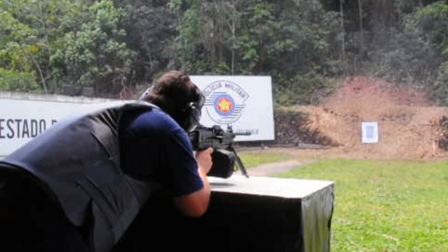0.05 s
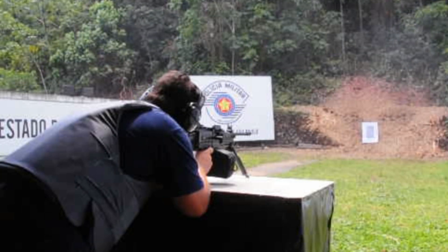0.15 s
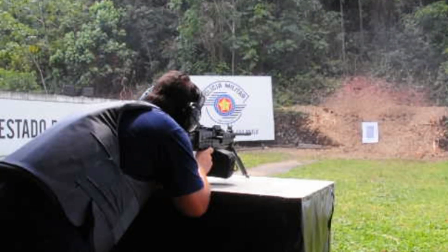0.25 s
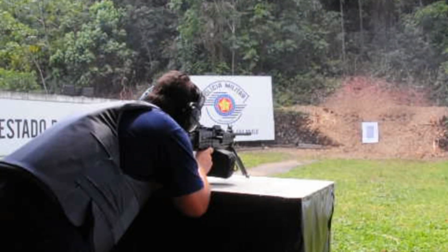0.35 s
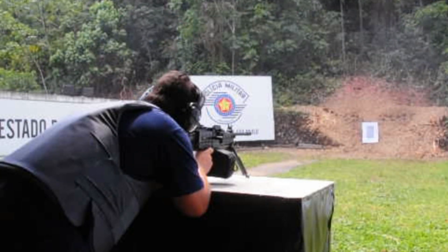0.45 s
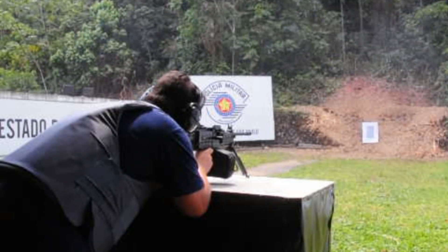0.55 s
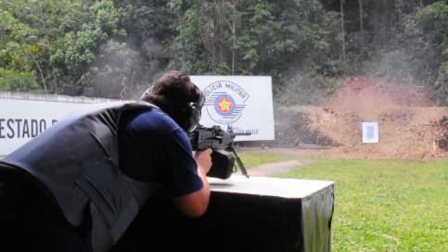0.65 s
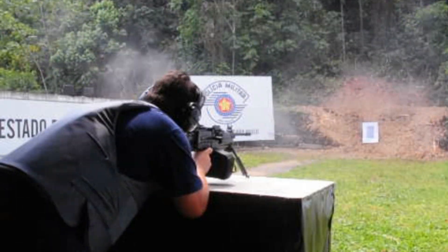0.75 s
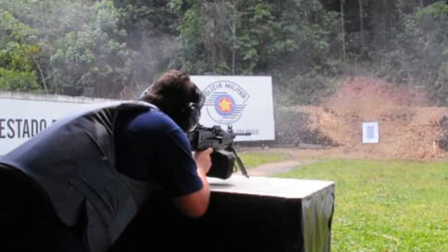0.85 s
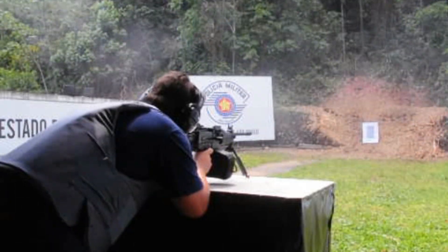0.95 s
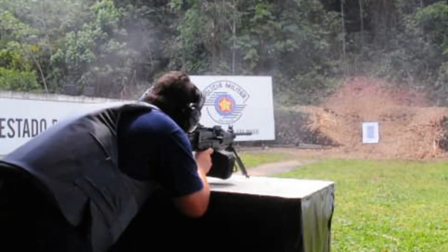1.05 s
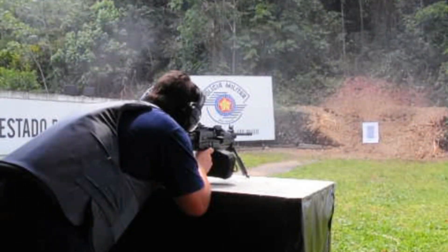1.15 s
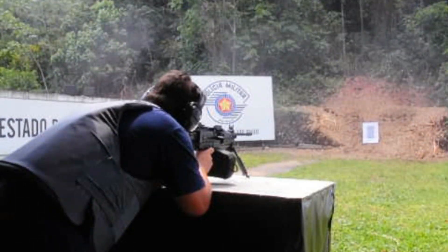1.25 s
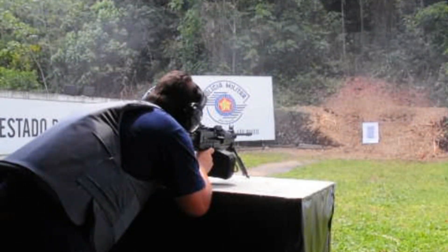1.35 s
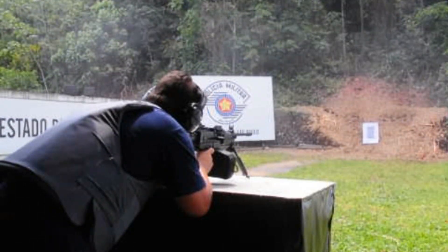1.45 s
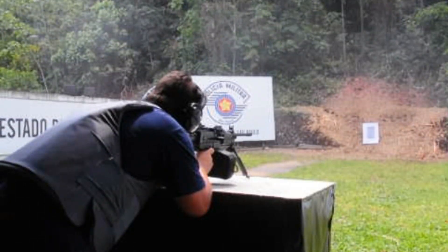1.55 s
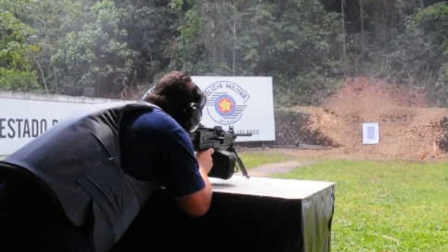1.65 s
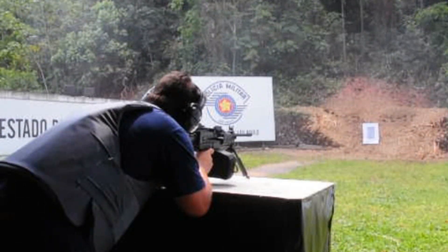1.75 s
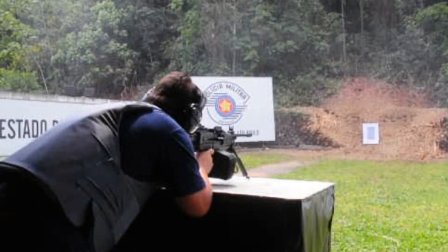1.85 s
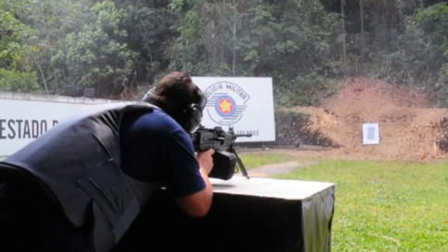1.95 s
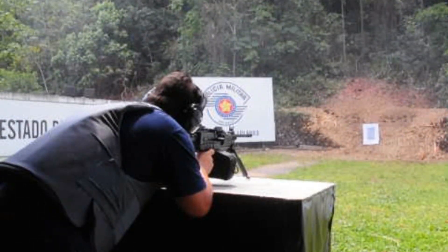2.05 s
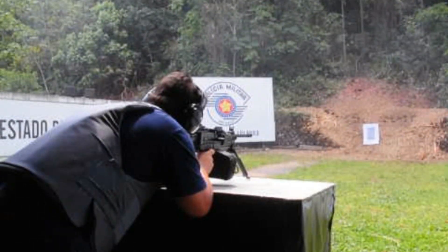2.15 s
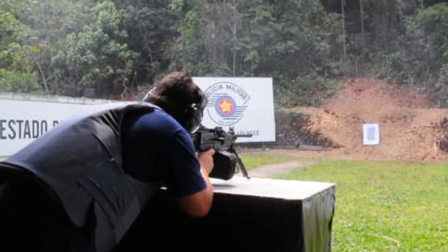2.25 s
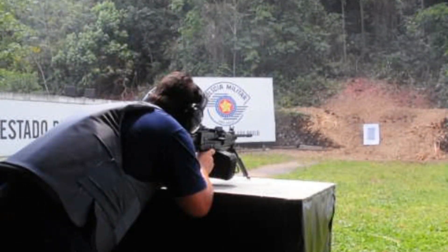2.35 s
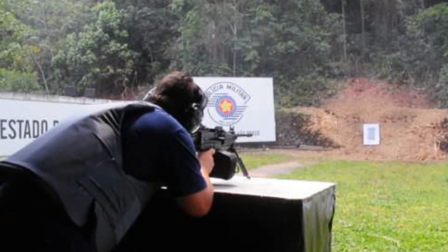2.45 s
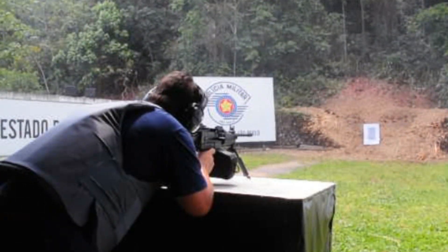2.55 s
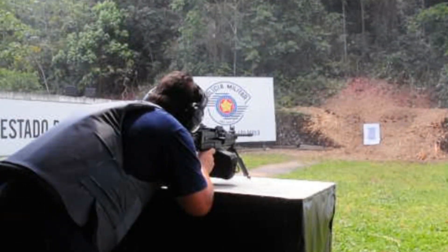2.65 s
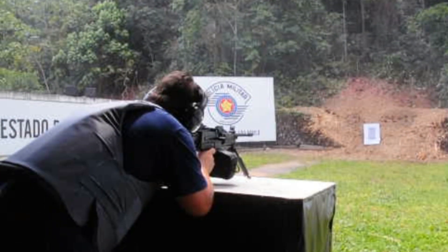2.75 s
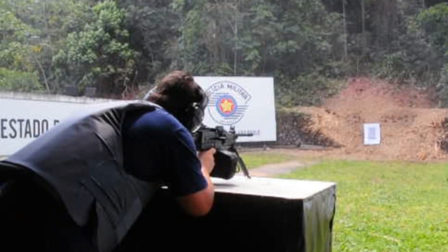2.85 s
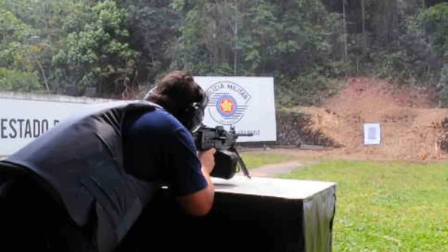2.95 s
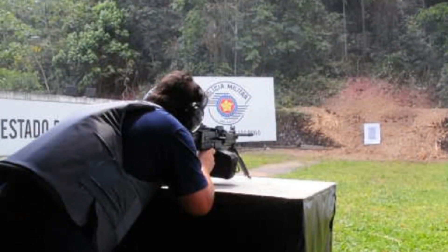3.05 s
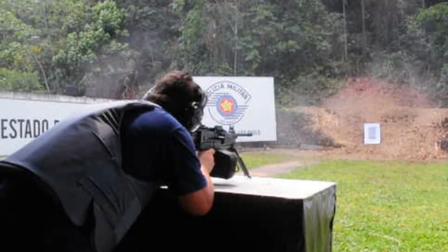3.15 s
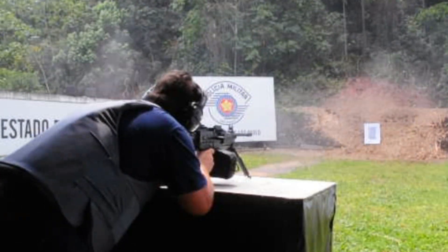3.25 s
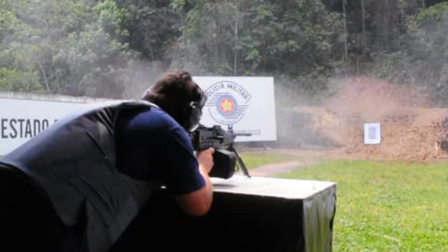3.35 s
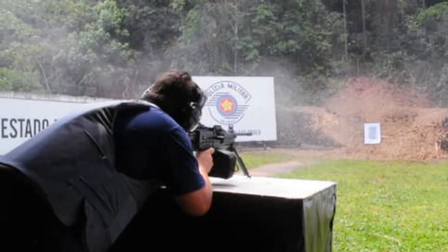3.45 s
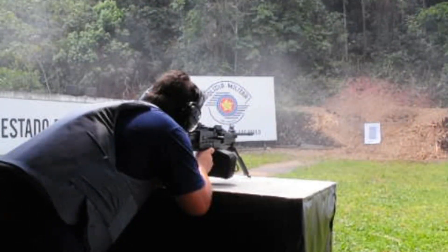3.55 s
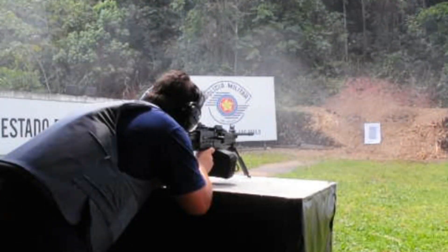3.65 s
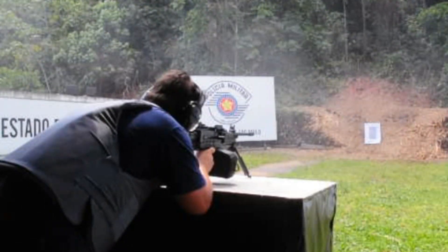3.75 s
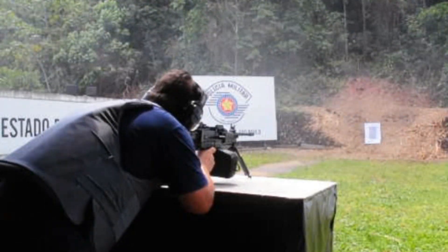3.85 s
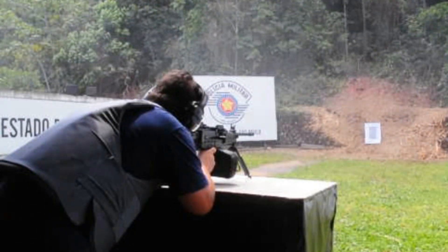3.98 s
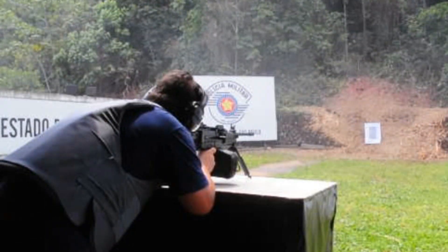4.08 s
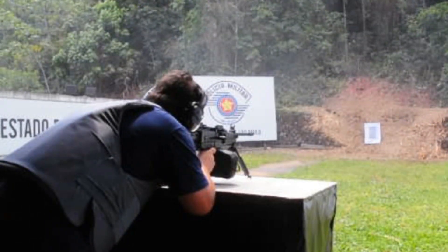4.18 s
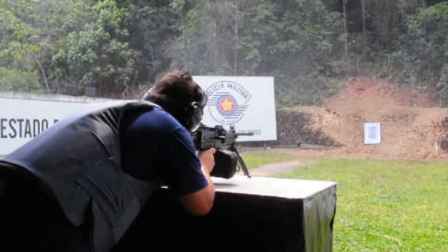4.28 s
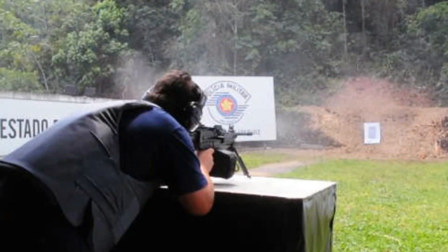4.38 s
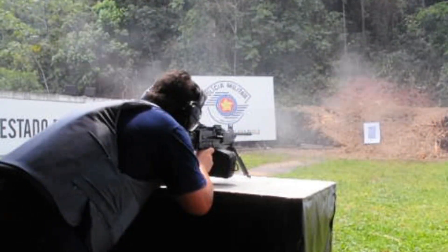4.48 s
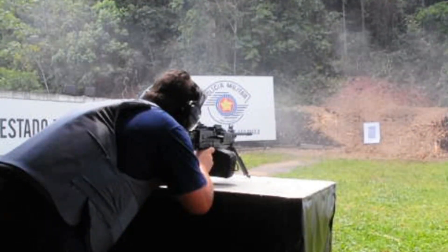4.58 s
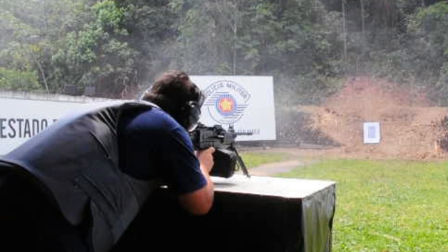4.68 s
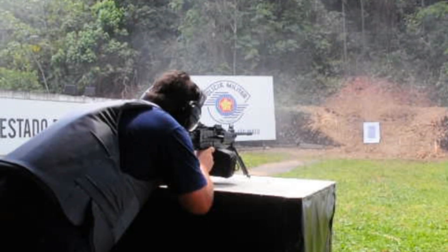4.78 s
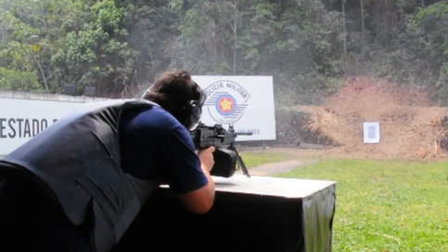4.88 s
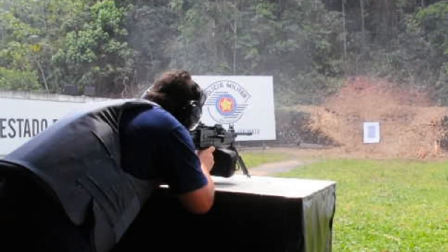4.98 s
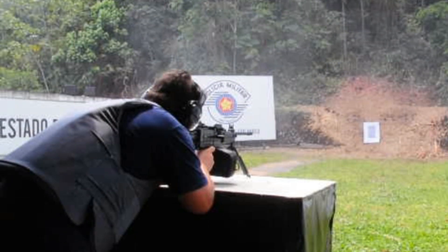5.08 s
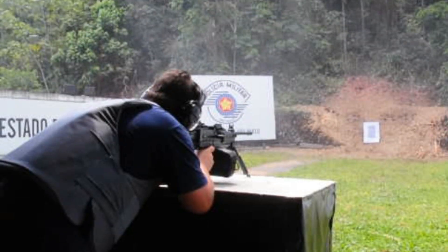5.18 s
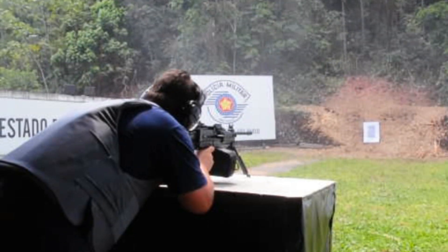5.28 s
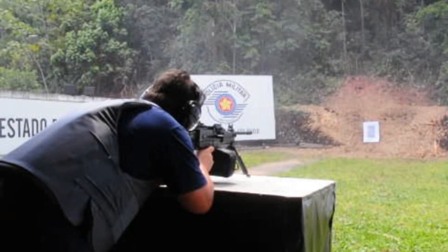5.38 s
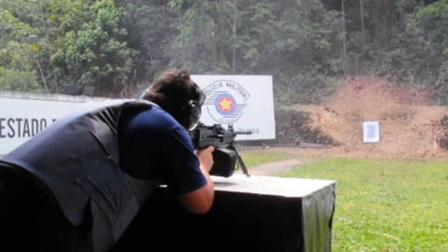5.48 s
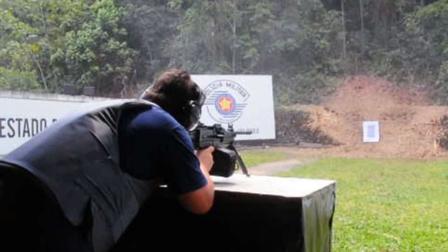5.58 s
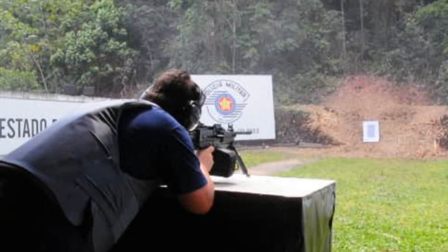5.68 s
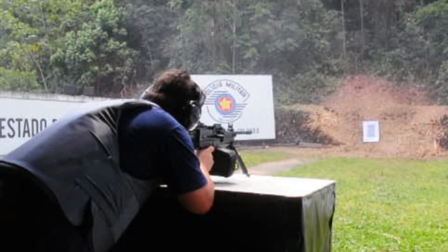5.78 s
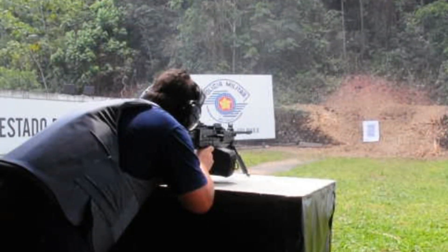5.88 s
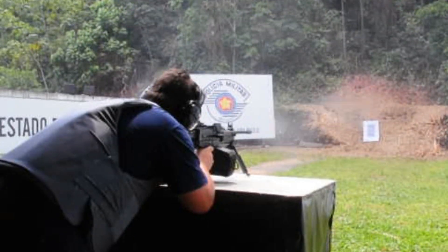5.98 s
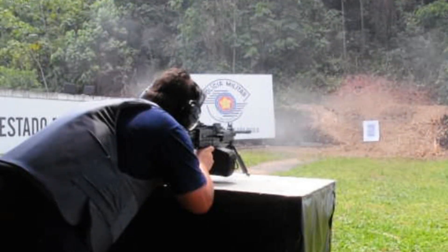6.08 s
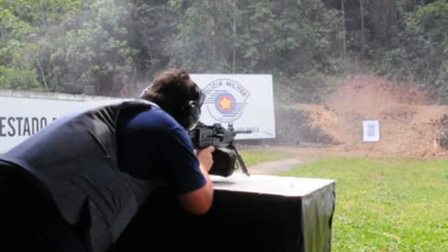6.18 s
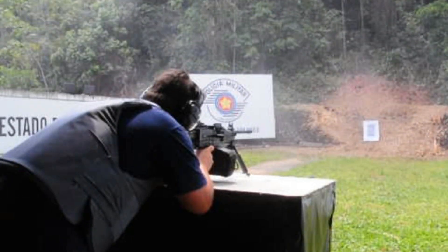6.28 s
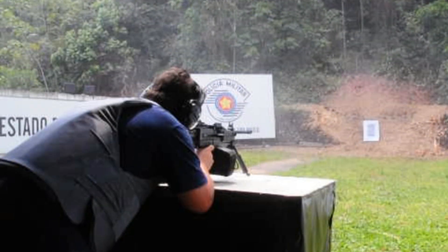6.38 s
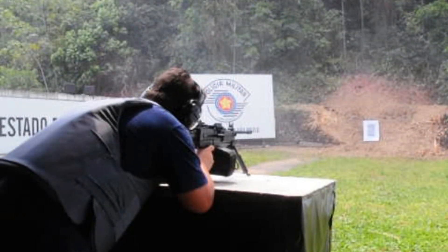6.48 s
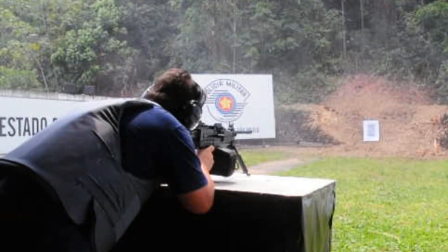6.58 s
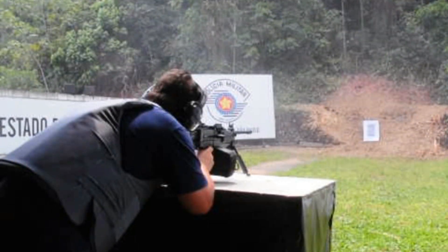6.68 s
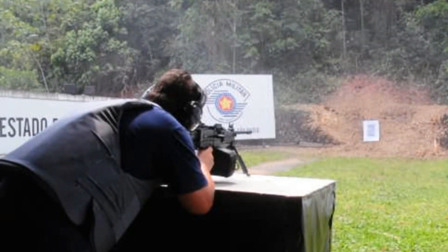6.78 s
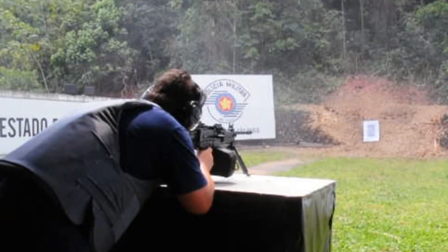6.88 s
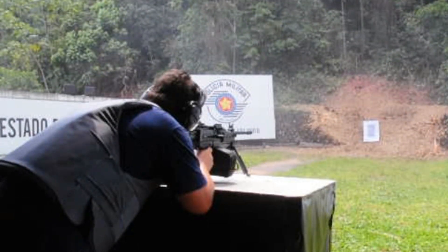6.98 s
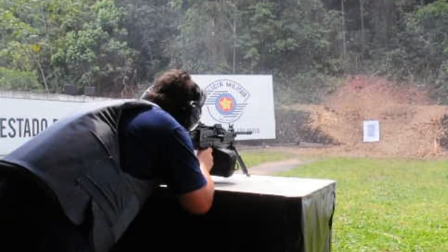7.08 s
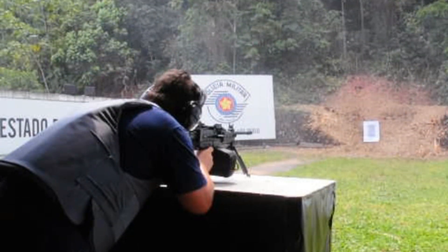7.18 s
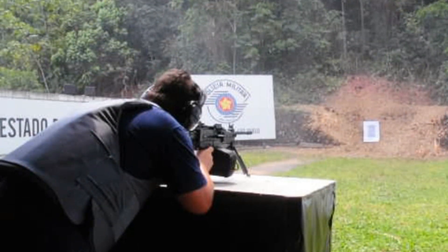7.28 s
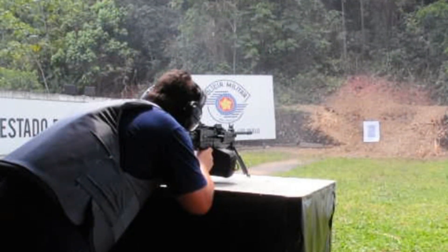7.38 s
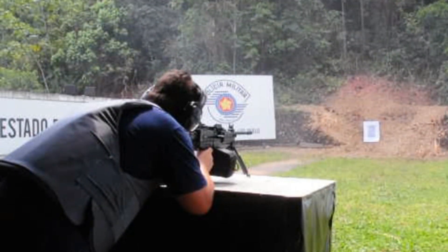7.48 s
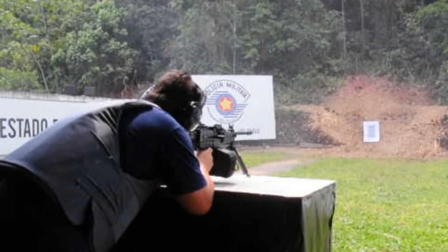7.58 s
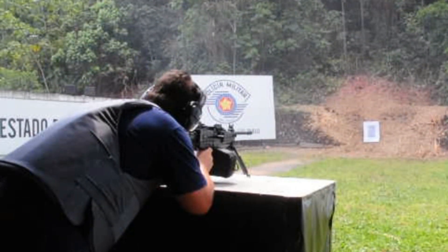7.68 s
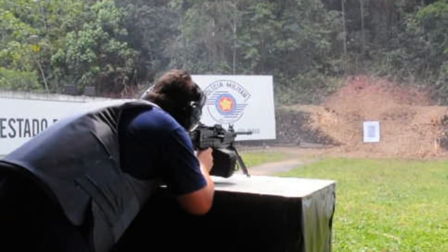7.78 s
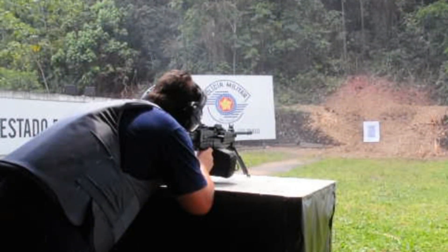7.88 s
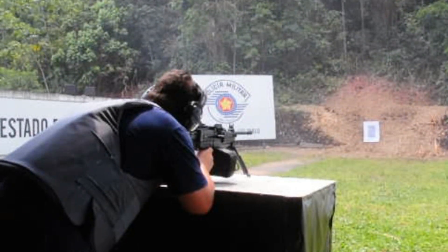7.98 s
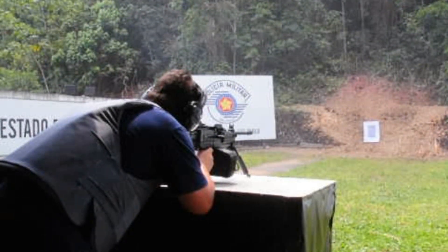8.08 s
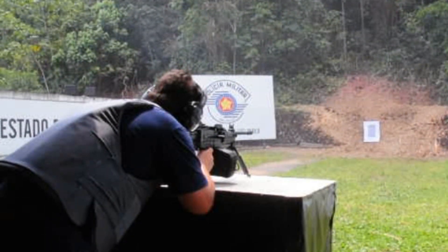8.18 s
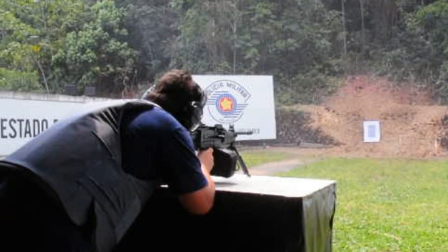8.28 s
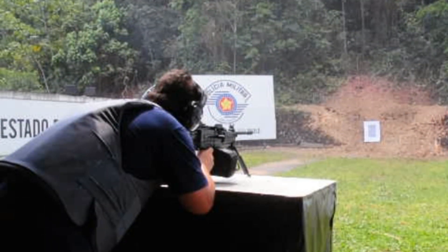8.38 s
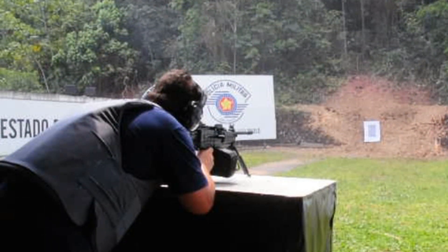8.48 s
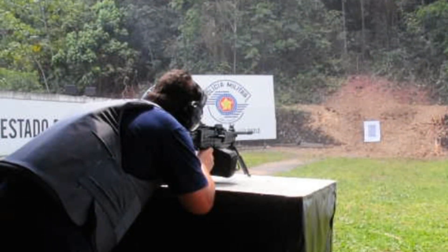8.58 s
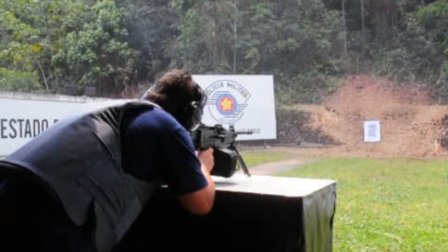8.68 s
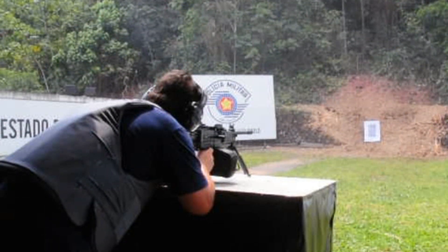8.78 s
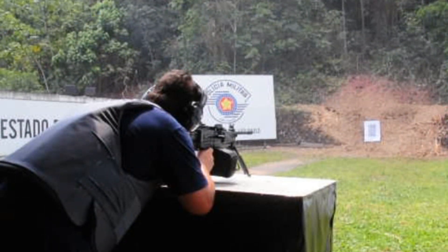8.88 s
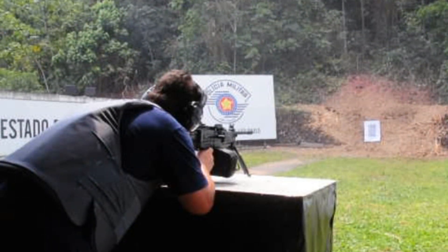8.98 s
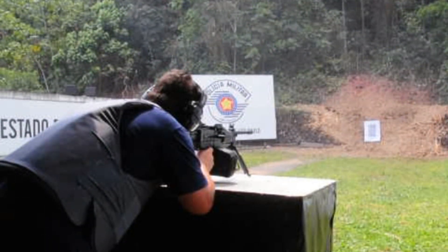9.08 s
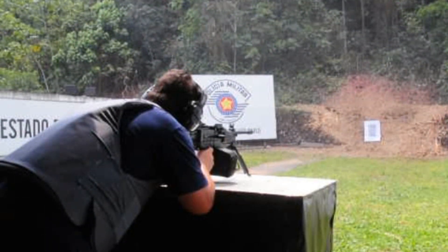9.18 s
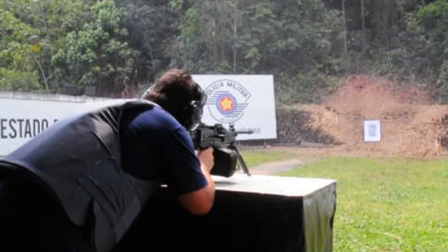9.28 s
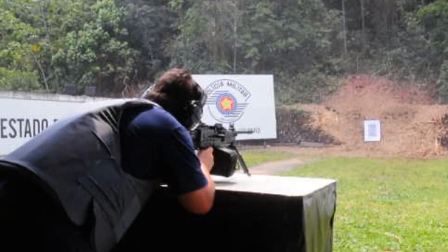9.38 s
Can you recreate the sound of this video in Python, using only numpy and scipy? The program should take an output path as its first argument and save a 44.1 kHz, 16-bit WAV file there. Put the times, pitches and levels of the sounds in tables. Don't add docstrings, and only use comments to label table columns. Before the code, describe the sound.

Heavy automatic gunfire in four brief bursts overloads a small microphone, echoing off walls, earth bank and forest, then fading into rustling leaves.

```python
import sys
import numpy as np
from scipy import signal
from scipy.fft import rfft, irfft, next_fast_len
from scipy.io import wavfile
from scipy.ndimage import uniform_filter1d

SR = 44100
rng = np.random.default_rng(int(sys.argv[2]) if len(sys.argv) > 2 else 0)


def to_wav(s):
    ch = np.atleast_2d(s).T
    pcm = np.round(np.clip(ch, -1, 1) * 32767)
    wavfile.write(sys.argv[1], SR, pcm.astype(np.int16))


def gain_from_db(level_db):
    decades = np.asarray(level_db, float) / 20
    return 10 ** decades


N = 416304

# t/s, level/dB, 20 dB fade/s
RUSTLES = [(0, -51.5, 1.5), (.1, -59, 3), (.25, -56, 0), (2.7, -50, 0.2), (3.02, -50, 2), (7.82, -49, 1.3),
           (8.085, -45, .08), (8.185, -44.5, 0.3), (8.4, -47.5, 0.6), (8.5, -42.5, 0.2),
           (8.56, -41.5, 0.18), (8.93, -47, .5), (9.13, -52, .7)]
# f/Hz, density/dB
LEAF_SPECTRUM = [(600, -21.5), (1500, 6), (2500, 7), (3600, 2), (4600, -4), (5400, -20)]
RUSTLE_LEAD, RUSTLE_BED_DB = .15, -74
# t/s, level/dB, 20 dB fade/s
GUSTS = [
    (0, -42.5, 0.7),
    (2.3, -58, .4),
    (4.35, -29, 0.9),
    (7.7, -52, 0),
    (8.43, -48, 0.8),
    (8.97, -50.5, .25),
]
# f/Hz, density/dB
WIND_SPECTRUM = [(15, -19.0), (40, -7.5), (70, -2.5), (115, -3.5), (200, -33.5), (400, -82)]
GUST_LEAD, BREEZE_DB, LUMPY_DB = 0.84, -61.5, 4
# f/Hz, density/dB
FLOOR_SPECTRUM = [(13, -46), (22, 4), (81, -8), (111, -15.5), (144, 3.5), (169, 1.5), (418, 1.5),
                  (897, -8.5), (1210, -3.5), (1640, -16), (3520, -24.5), (4550, -35.5), (5600, -66.5),
                  (7280, -76), (12300, -120)]
FLOOR_DB = -39
# f/Hz, width/Hz, level/dB
MACHINERY = [(1226, 150, -48.5), (1420, 150, -51.5), (2058, 50, -59.5), (1067, 88, -52)]

# t/s, level/dB, rise/s, t60/s
TRIGGER = (.529, -34, .0025, .08)
# sear release t/s, round strip t/s, first shot t/s, bolt force/dB
BURSTS = [
    (0.57, 0.594, .632, 2.5),
    (3.066, 3.085, 3.126, 1.5),
    (4.359, 4.381, 4.417, -3.5),
    (5.964, 5.986, 6.021, 0),
]
# offset/s, level/dB, rise/s, t60/s
STROKE = [
    (0, -20.5, 0.0016, 0.18),
    (0.0058, -17, .001, .045),
    (0, -5.5, 0.003, .045),
    (.014, -16.5, .004, 0.18),
    (-.009, -9.5, 0.0028, 0.088),
]
# f/Hz, density/dB
STEEL_SPECTRUM = [(88, -46.5), (150, -33.5), (283, -9.5), (395, -24.5), (1070, -9.5), (1690, -12.5),
                  (2790, -4.5), (3660, -13), (4140, -8), (5600, -25), (7280, -41), (12300, -120)]
# f/Hz, level/dB, t60/s
BOLT_RING = [(2800, -12, .04), (4250, -2, 0.032)]

ROUNDS = [2, 4, 2, 2]
CYCLE_S = .088
# f/Hz, density/dB
SLAP_SPECTRUM = [(100, -30), (300, -13), (650, -1), (1050, 0), (1800, -4), (2800, -10), (4500, -15),
                 (5500, -30), (7000, -80)]
# delay/s, level over echo/dB, length/s
WALL_PUSHES = [(.064, 7, .0008), (.083, 13, .0009), (.099, 12, .00085), (.114, 10, .0008),
               (.147, 14, .00095), (.179, 13, .00085)]
# f/Hz, density/dB
ECHO_SPECTRUM = [(15, -56.5), (25, -25), (95, -26.5), (137, -12), (230, -9.5), (269, -0.5), (309, -0.5),
                 (609, -8.5), (1070, -8), (1310, -13.5), (2420, -18), (3900, -31), (5600, -51),
                 (7280, -98.5), (12300, -120)]
# f/Hz, rise/s
ECHO_RISE = [(100, .085), (300, .07), (500, .05), (800, .015), (3000, .005)]
# f/Hz, extra loss/(dB/s)
AIR_LOSS = [(60, 7), (150, 5), (300, -1), (1000, 1), (2000, 3.5), (3300, 7), (4800, 10)]
# f/Hz, width/Hz, level/dB
STANDING_WAVES = [(205.6, 27, -4.5), (272.4, 8.74, 10), (359.6, 16, -3), (961, 40, -7), (1085.5, 20, -9)]
BANK_DB, BANK_S, BANK_BEND, FOREST_DB, FOREST_DB_PER_S = 17.5, 0.31, 1.39, -5.5, 16.5

# t/s, level/dB, f/Hz, t60/s
CASES = [
    (1.655, -39.5, 3820, .5),
    (7.82, -41, 1580, .2),
]
# t/s, level/dB, 20 dB fade/s
HILL_RETURNS = [
    (7.6, -28.5, 0.2),
    (8.07, -35.5, 0.6),
    (8.25, -36, 0.5),
    (8.55, -27, 0.13),
    (8.72, -42, 0),
]
# f/Hz, density/dB
HILL_SPECTRUM = [(70, -26.5), (140, -5.5), (200, -6.5), (300, 7.5), (450, -10.0), (900, -9),
                 (2000, -30), (5500, -55)]
HILL_LEAD = 0.93

# f/Hz, gain/dB
PLAYBACK = [(5000, 0), (5500, -5.5), (6000, -21.5), (6500, -36.5), (8000, -45), (9000, -59.5),
            (11000, -94.5)]
LIMIT_DB, LIMIT_S = 9, 0.0026
FIRST_CEILING, CEILING = .418, .412
GLITCH_S, GLITCH_HZ, GLITCH_WIDTH_S = 4.5093, 12500, .00009


def evened(x):
    return x / np.sqrt(np.mean(x ** 2) + 1e-20)


def read(points, hz):
    f, value = np.transpose(points)
    return np.interp(np.log(hz + 1), np.log(f + 1), value)


def add(mix, s, sound):
    part = mix[round(s * SR):][:len(sound)]
    part += sound[:len(part)]


def tinted(points, size):
    hz = np.fft.rfftfreq(size, 1 / SR)
    z = rfft(rng.standard_normal(size)) * gain_from_db(read(points, hz))
    return evened(irfft(z, size))


def swelling(rows, lead):
    t = np.arange(0, N, 64) / SR
    power = 0
    for s, db, fade_s in rows:
        drop = np.maximum((t - s) / fade_s, (s - t) / (lead * fade_s))
        power = power + gain_from_db(db - 20 * drop) ** 2
    gain = uniform_filter1d(np.sqrt(power), size=9)
    return np.interp(np.arange(N) / SR, t, gain)


def rustle(under_db=-2, grain_db=2.0):
    grain = evened(uniform_filter1d(rng.standard_normal(N), size=300))
    gain = swelling(RUSTLES, RUSTLE_LEAD) + gain_from_db(RUSTLE_BED_DB)
    return gain * gain_from_db(under_db + grain_db * grain) * tinted(LEAF_SPECTRUM + [(7000, -80)], N)


def wind(under_db=-2):
    smooth = uniform_filter1d(rng.standard_normal(N), size=4000)
    lumps = evened(uniform_filter1d(smooth, size=2000))
    gain = swelling(GUSTS, GUST_LEAD) + gain_from_db(BREEZE_DB + LUMPY_DB * lumps)
    return gain * gain_from_db(under_db) * tinted(WIND_SPECTRUM, N)


def floor(swell_db=.4):
    hz = np.fft.rfftfreq(N, 1 / SR)
    bands = np.zeros(N)
    for f, width_hz, db in MACHINERY:
        z = rfft(rng.standard_normal(N)) / (1 + (2 * (hz - f) / width_hz) ** 2)
        bands += gain_from_db(db) * evened(irfft(z, N))
    swell = evened(uniform_filter1d(rng.standard_normal(N), size=3000))
    bed = gain_from_db(FLOOR_DB) * tinted(FLOOR_SPECTRUM + [(20000, -80)], N)
    return gain_from_db(swell_db * swell) * (bed + bands)


def knocks(rows):
    out, t = np.zeros(N), np.arange(SR // 4) / SR
    for s, db, rise_s, t60_s in rows:
        envelope = gain_from_db(db - 60 * t / t60_s) * np.minimum(t / rise_s, 1)
        add(out, s, envelope * tinted(STEEL_SPECTRUM, len(t)))
    return out


def action():
    rows = [TRIGGER]
    for sear, strip, shot, force_db in BURSTS:
        for at, (late_s, db, rise_s, t60_s) in zip((sear, sear, strip, strip, shot), STROKE):
            rows.append((at + late_s, db + force_db, rise_s, t60_s))
    out, t = knocks(rows), np.arange(SR // 10) / SR
    for sear, strip, shot, force_db in BURSTS:
        ring = np.zeros(len(t))
        for hz, db, t60_s in BOLT_RING:
            tone = np.sin(2 * np.pi * (hz * rng.uniform(0.76, 1.03) * t + rng.random()))
            ring += gain_from_db(db - 60 * t / t60_s) * tone
        add(out, strip, gain_from_db(force_db) * np.minimum(t / .005, 1) ** 2 * ring)
    return out


def returns(size):
    hz = np.fft.rfftfreq(512, 1 / SR)[:, None]
    t = np.arange(size // 128 + 5) * 128 / SR
    a, b = rng.standard_normal((len(t), 257, 2)).T
    build_up = 1 - np.exp(-(t / read(ECHO_RISE, hz)) ** 3)
    shape = gain_from_db(read(ECHO_SPECTRUM, hz) - read(AIR_LOSS, hz) * (t - 1)) * build_up
    x = signal.istft((a + 1j * b) * shape, nperseg=512, noverlap=384)[1][:size]
    return x / np.std(x[SR // 2:3 * SR // 2])


def gun(waves_s=1.1):
    out, size = np.zeros(N), 3 * SR
    t, hz = np.arange(size) / SR, np.fft.rfftfreq(size, 1 / SR)
    waves = sum(gain_from_db(db) / (1 + 2j * (hz - f) / width_hz) for f, width_hz, db in STANDING_WAVES)

    bank = gain_from_db(BANK_DB - 10 * (t / BANK_S) ** BANK_BEND)
    forest = gain_from_db(FOREST_DB - FOREST_DB_PER_S * t)
    level = np.hypot(bank, forest) * np.minimum(5 * (t[-1] - t), 1)

    over_db, hold_s, rise_s = 11, .06, .005
    slap = gain_from_db(over_db - 14 * (t / hold_s) ** 2) * np.minimum(t / rise_s, 1) ** 2
    pushes = np.zeros(size)
    for s, db, length_s in WALL_PUSHES:
        u = (t - s) / length_s
        pushes += gain_from_db(db) * (u ** 2 - 1) * np.exp(-.5 * u ** 2)

    near = returns(size)
    for burst, count in zip(BURSTS, ROUNDS):
        for k in range(count):
            paths = .5 * near + 0.82 * returns(size)
            ringing = irfft(rfft(paths) * waves, size)
            paths = paths + np.exp(-(t / waves_s) ** 2) * ringing
            blast = level * (paths + pushes + slap * tinted(SLAP_SPECTRUM, size))
            add(out, burst[2] + k * CYCLE_S, blast)
    return out


def brass(rise_s=.012):
    out, t = np.zeros(N), np.arange(SR // 2) / SR
    for s, db, hz, t60_s in CASES:
        ring = sum(np.sin(2 * np.pi * (hz * k * t + rng.random())) for k in (.975, 1.0, 1.03))
        add(out, s, gain_from_db(db - 60 * t / t60_s) * np.minimum(t / rise_s, 1) * ring)
    return out


def hill(under_db=-4):
    return swelling(HILL_RETURNS, HILL_LEAD) * gain_from_db(under_db) * tinted(HILL_SPECTRUM, N)


def limited(x):
    level = np.sqrt(abs(uniform_filter1d(x ** 2, int(LIMIT_S * SR) + 1, axis=1)))
    return x / np.maximum(level / gain_from_db(LIMIT_DB), 1)


def glitched(x):
    u = np.arange(x.shape[1]) / SR - GLITCH_S
    gate = np.exp(-(u / GLITCH_WIDTH_S) ** 4)
    return x * (1 - gate) + gate * CEILING * np.cos(2 * np.pi * GLITCH_HZ * u)


def scene():
    return (rustle() + wind() + floor() + action() + gun() + brass() + hill())[None]


def band_limit(x):
    return signal.sosfilt(signal.butter(12, 16640, fs=SR, output="sos"), x)


def record(dry, edge_hz=5250, edge_width_hz=500, soften_hz=17000):
    size = next_fast_len(N + 4096, True)
    hz = np.fft.rfftfreq(size, 1 / SR)
    narrow = np.cos(np.pi / 2 * np.clip((hz - edge_hz) / edge_width_hz + .5, 0, 1)) ** 2
    padded = np.pad(limited(dry), ((0, 0), (0, size - N)), "linear_ramp")
    saturated = np.clip(irfft(rfft(padded) * narrow, size), -FIRST_CEILING, FIRST_CEILING)
    held = 4 * (np.arange(size) % 4 == 0) * saturated
    played = irfft(rfft(held) * gain_from_db(read(PLAYBACK + [(12000, -120)], hz)), size)
    shaved = np.clip(played, -CEILING, CEILING)
    soft = irfft(rfft(glitched(shaved)) / np.sqrt(1 + (hz / soften_hz) ** 4), size)[:, :N]
    return band_limit(soft)


dry = scene()
out = record(dry)
to_wav(out)
```